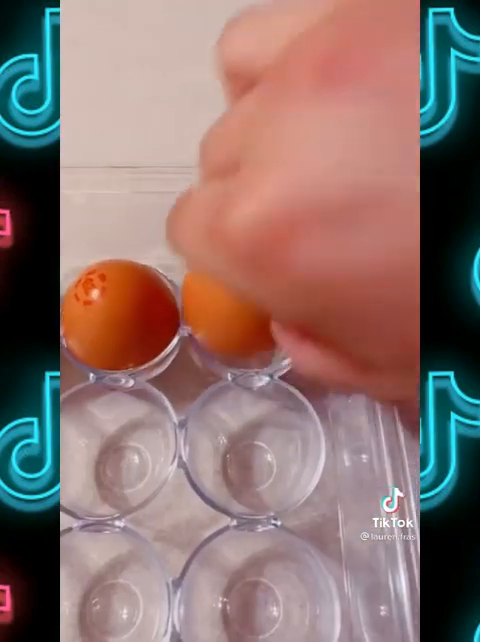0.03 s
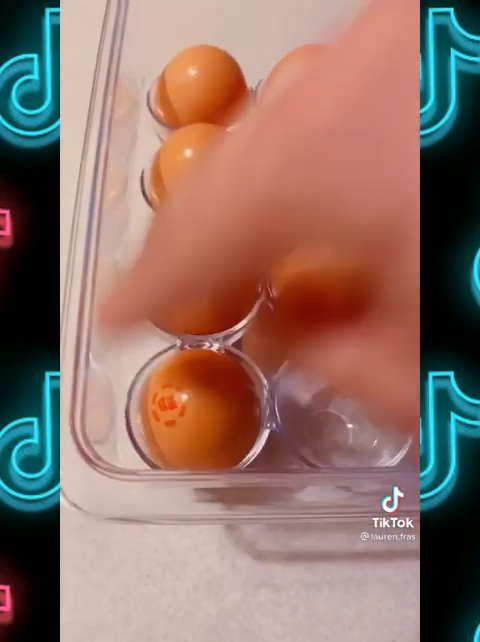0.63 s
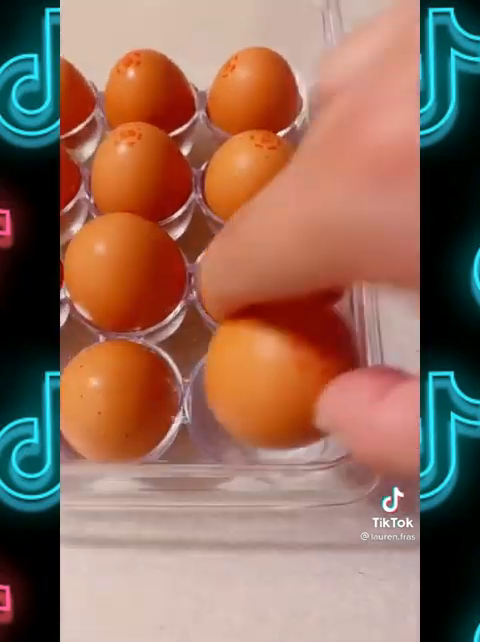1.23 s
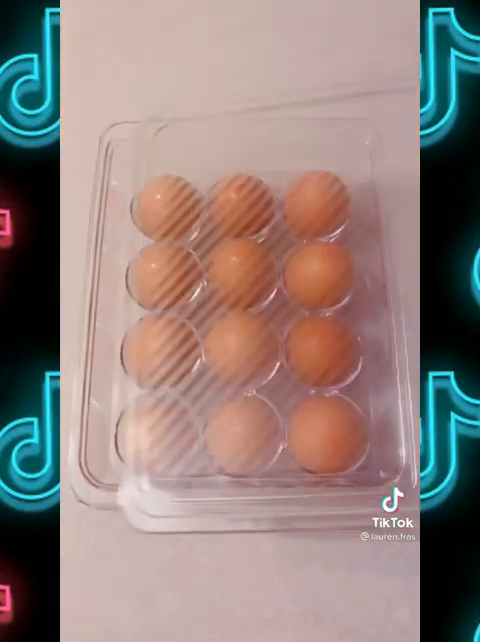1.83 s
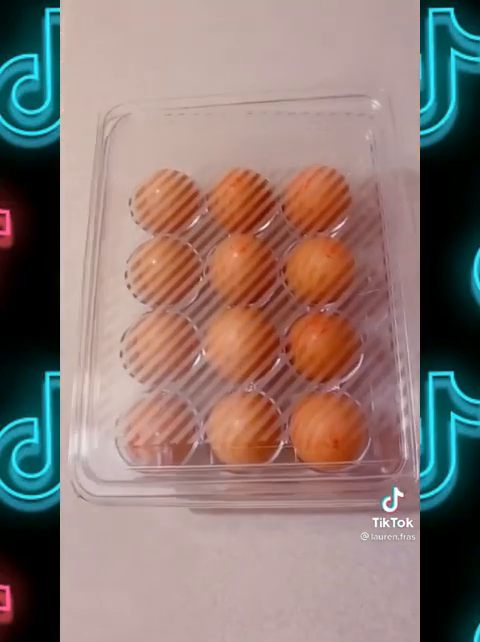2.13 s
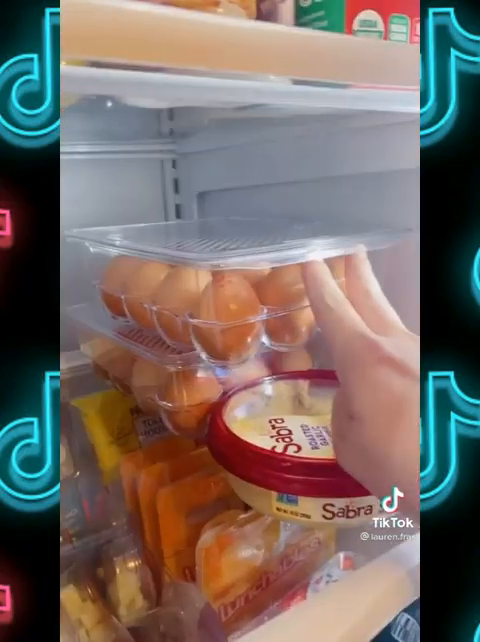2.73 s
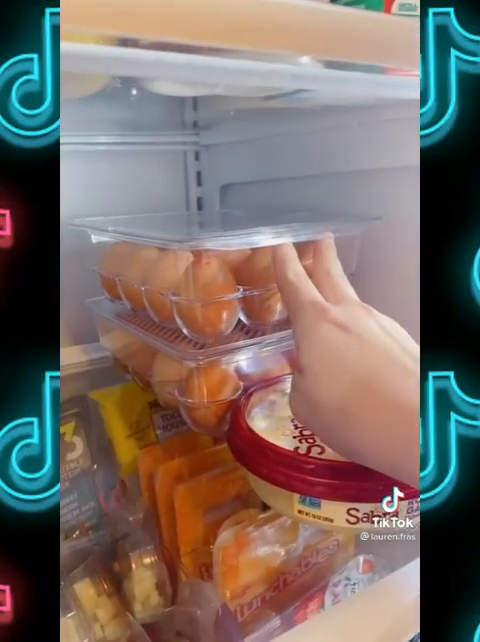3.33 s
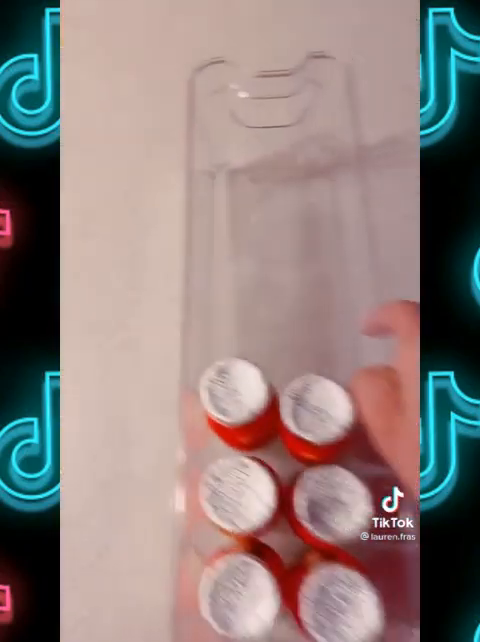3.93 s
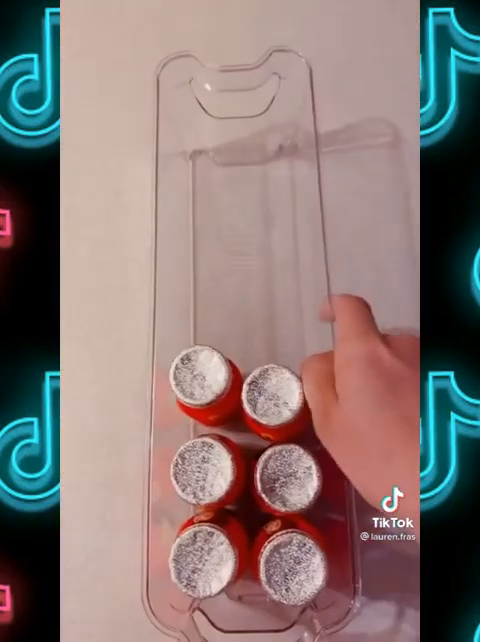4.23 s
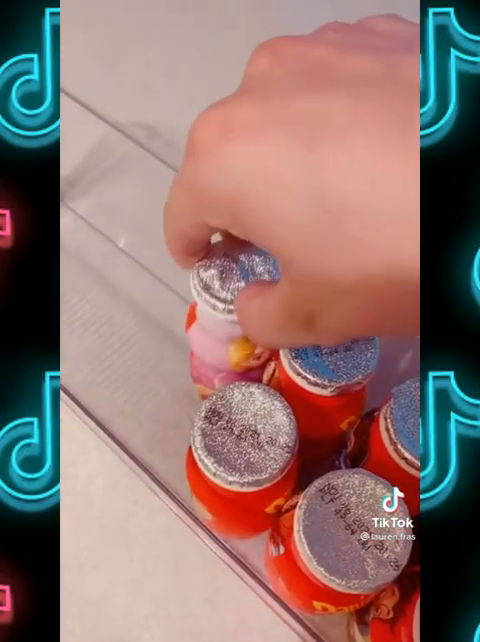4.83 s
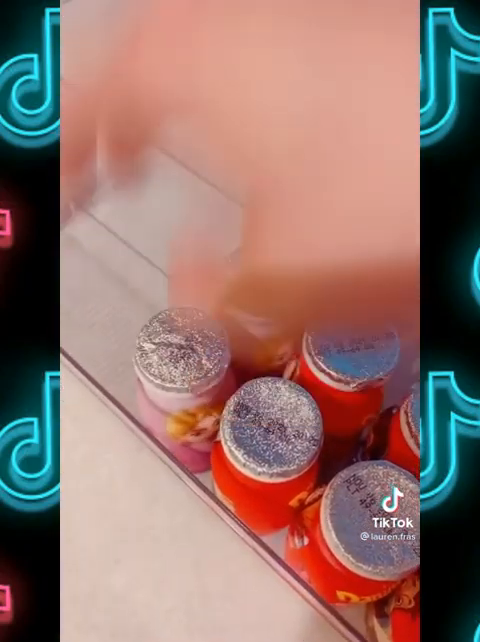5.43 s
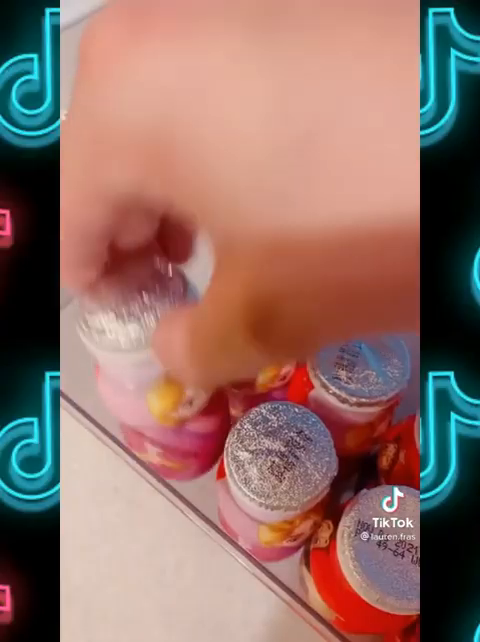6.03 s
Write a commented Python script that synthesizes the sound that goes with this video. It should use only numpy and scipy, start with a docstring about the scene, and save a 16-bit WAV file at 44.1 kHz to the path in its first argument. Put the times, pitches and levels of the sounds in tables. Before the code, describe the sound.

Close up in a kitchen, eggs are set into a plastic tray with quick, uneven taps and little rubs. The lid clacks on with a hollow boom, and the tray bumps and scrapes into a faintly humming fridge. A long plastic bin then drops onto the counter, bounces and settles, and small bottles are stood in it with light knocks. The action comes in short bursts with a slight room echo, cut apart by dead silence.

```python
"""A kitchen, heard close up. Eggs are set into a plastic tray, its lid is clapped on and the tray slides
into a humming fridge. Then a long plastic bin drops onto the counter and small bottles are stood in it.
Each impact excites the damped modes of the bodies that meet, and the air under the lid booms as a cavity.
Stick-slip friction makes the rubs and scrapes; brief swishes swell into the taps. The room adds echoes,
low noise and a thin whine; the action comes in short stretches with dead silence between them."""
import sys
import numpy as np
from scipy import signal
from scipy.fft import rfft, irfft
from scipy.io import wavfile
from scipy.ndimage import uniform_filter1d

SR = 44100
rng = np.random.default_rng(int(sys.argv[2]) if len(sys.argv) > 2 else 0)


def dump(signal):
    """Clip the signal to [-1, 1] and save it as 16-bit WAV at the path in sys.argv[1]."""
    limited = np.clip(np.atleast_2d(signal).T, -1, 1)
    pcm = np.round(limited * 32767).astype(np.int16)
    wavfile.write(sys.argv[1], SR, pcm)


N = 271920
TIME = np.arange(N) / SR
RING_TIME = TIME[:SR // 3]
RING_BINS_HZ = np.fft.rfftfreq(len(RING_TIME), 1 / SR)
PUSH_START_S, PUSH_SLOWS_S, PUSH_END_S = 2.69, 3.11, 3.67  # the tray goes into the fridge

# spectrum of friction on plastic (frequency [Hz], level [dB])
RUB_COLOUR = [(80, -3), (300, -28.5), (900, 9), (1600, 2), (2400, 2.5), (3300, -7), (6000, -16),
              (15000, -41)]


def amp(db):
    """Decibels to amplitude ratio."""
    return 10 ** (np.asarray(db) / 20)


def unit(x):
    """Normalisation to rms 1."""
    return x / np.sqrt(np.mean(x ** 2) + 1e-20)


def read(table, hz):
    """Interpolation of a table's columns on a log-frequency axis."""
    f, *columns = np.transpose(table)
    return [np.interp(np.log(hz + 1), np.log(f), c) for c in columns]


def held(table, s):
    """A step function of time: each row holds until the next."""
    start, value = np.transpose(table)
    return value[np.searchsorted(start[1:], s)]


def add(mix, s, sound):
    """Superposition: a sound joins the mix at time s."""
    start = round(s * SR)
    sound = sound[max(-start, 0):]
    part = mix[max(start, 0):][:len(sound)]
    part += sound[:len(part)]


def coloured(x, colour):
    """Spectral shaping of x, at rms 1."""
    gain = amp(read(colour, np.fft.rfftfreq(len(x), 1 / SR))[0])
    return unit(irfft(rfft(x) * gain, len(x)))


def noise_from(spectrum):
    """Random phases turn a spectrum into steady noise."""
    return irfft(spectrum * np.exp(2j * np.pi * rng.random(len(RING_BINS_HZ))))


def damped(carriers, hz, t60, rise_cycles=1.6):
    """Each row builds up over its first cycles, so bass comes late, and decays exponentially."""
    swell = 1 - np.exp(-RING_TIME * hz[:, None] / rise_cycles)
    rings = carriers * swell * amp(-60 * RING_TIME / t60[:, None])
    return rings / np.linalg.norm(rings, axis=1, keepdims=True) * np.sqrt(SR / 100)  # 10 ms at rms 1


def contact(hz, bass_db, treble_db):
    """Excitation spectrum: a heavy blow adds bass, a hard and short one adds treble."""
    return amp(read([(250, bass_db), (900, 0.002), (1600, 0.0095), (6000, treble_db)], hz)[0])


def ring(modes, bass_db=0, treble_db=0, detune=0.0067):
    """Normal modes, shifted slightly by where the blow lands; neighbours swing in antiphase."""
    hz, db, t60 = np.transpose(modes)
    hz = hz * (1 + detune * rng.standard_normal(len(hz)))
    waves = np.sin(2 * np.pi * hz[:, None] * RING_TIME) * (-1) ** np.arange(len(hz))[:, None]
    return amp(db) * contact(hz, bass_db, treble_db) @ damped(waves, hz, t60)


def clatter(wall, bass_db, treble_db, count=27):
    """Modal overlap: crowded modes merge into noise bands, each decaying at its own rate."""
    edges = np.geomspace(48, 16500, count + 1)
    hz = np.sqrt(edges[1:] * edges[:-1])
    bands = noise_from((RING_BINS_HZ >= edges[:-1, None]) & (RING_BINS_HZ < edges[1:, None]))
    db, t60 = read(wall, hz)
    return amp(db) * contact(hz, bass_db, treble_db) @ damped(bands, hz, t60)


def knock(modes, wall, bass_db, treble_db, click_db=-6, click_s=0.00012):
    """Impact on a plastic body: a contact click, then free vibration of the walls."""
    u = RING_TIME / click_s
    click = amp(click_db + treble_db) * 2 * u * (2 - u) * np.exp(-u)
    return click + amp(-7) * (ring(modes, bass_db, treble_db) + clatter(wall, bass_db, treble_db))


def knocked(blows, modes, wall):
    """The responses of one body to successive blows add linearly."""
    out = np.zeros(N)
    for s, db, bass_db, treble_db in blows:
        add(out, s, amp(db) * knock(modes, wall, bass_db, treble_db))
    return out


def placed(taps, modes, wall, pitches, firm_bass_db, ring_db, ring_t60, swish_db, swish_s):
    """An impact excites both object and plastic; a brief, duller swish swells into each tap."""
    firm_db, thud_db_per_db = -19.5, 0.29  # the gentler a tap, the more of it is thud
    out, swell = np.zeros(N), np.linspace(0, 1, round(swish_s * SR))
    dull = contact(RING_BINS_HZ, bass_db=-2, treble_db=-4)
    for s, db, treble_db in taps:
        hz = held(pitches, s)
        bass_db = firm_bass_db + thud_db_per_db * (firm_db - db)
        # a nearly round shell rings in a close pair of modes
        shell = ring([(hz, ring_db, ring_t60), (hz * 1.09, ring_db - 6, ring_t60)])
        tap = knock(modes, wall, bass_db, treble_db) + shell
        swish = noise_from(rfft(tap) * dull)[:len(swell)]
        add(out, s, amp(db) * tap)
        add(out, s - swish_s, amp(db + swish_db) * swell * unit(swish))
    return out


def slips(colour, per_s, spread_db):
    """Stick-slip friction: a random stream of tiny impulses of uneven strength."""
    strength = amp(spread_db * np.minimum(rng.exponential(1, N), 4))
    impulses = rng.standard_normal(N) * strength * (rng.random(N) < per_s / SR)
    return coloured(impulses, colour)


def pressure(strokes):
    """Friction's envelope: contact pressure rises and falls with each stroke."""
    out = np.zeros(N)
    for s, length, db in strokes:
        add(out, s, amp(db) * signal.windows.tukey(round(length * SR), .5))
    return out


def slide(start_s, slows_s, end_s, colour, rumble_db, scrape_db, rumble_db_per_s, scrape_db_per_s):
    """Sliding friction: the body rumbles and the plastic scrapes; on slowing, the scrape dies first."""
    slowing_s = np.maximum(TIME - slows_s, 0)
    rumble = amp(rumble_db + rumble_db_per_s * slowing_s) * coloured(rng.standard_normal(N), colour)
    scrape = amp(scrape_db + scrape_db_per_s * slowing_s) * slips(RUB_COLOUR, per_s=13000, spread_db=2.5)
    return (rumble + scrape) * (TIME > start_s) * (TIME < end_s)


def egg_taps():
    """Each egg excites the modes of its cup and the natural frequency of its own shell."""
    # an egg meets its cup (time [s], level [dB], treble [dB])
    taps = [(.016, -38, 1.5), (.0797, -18.5, 1), (.166, -31, -2), (.1795, -22, 0.5), (.4692, -20, 9),
            (.5478, -25.5, -3), (.633, -21.5, 1.5), (.651, -17.5, -4.5), (.663, -22, -8.5),
            (.919, -20.5, 1), (1.0145, -11, -1), (1.085, -32, -7), (1.150, -33, -1.5), (1.284, -39.5, 5),
            (1.3995, -25.5, 4), (1.4643, -11.5, -4.5), (1.559, -33.5, -3.5)]
    # the cup's distinct modes (frequency [Hz], level [dB], t60 [s])
    modes = [(243, -14.5, 0.023), (410, -11.5, 0.013), (988.5, -2, 0.035), (1290, -8.5, 0.048),
             (1810, -13.5, 0.066), (2263, -7.5, 0.064), (2590, -12, 0.031), (3342, -23, 0.062),
             (3913, -15, 0.032), (4534, -22.5, 0.025)]
    # its crowded wall modes (frequency [Hz], band level [dB], t60 [s])
    wall = [(45, -47, 0.063), (147, -15.5, 0.077), (384, -9.5, 0.026), (583, -12.5, .035),
            (830, -4.5, 0.012), (1530, -8.5, 0.11), (2250, -7, 0.022), (3000, -7.5, 0.05),
            (4500, -18, 0.07), (6050, -21.5, 0.033), (9910, -33, 0.027), (14900, -45, .02)]
    # each egg's shell note (start time [s], frequency [Hz])
    pitches = [(0, 1710), (.35, 2273), (.78, 1316), (1.22, 2382)]
    return placed(taps, modes, wall, pitches, firm_bass_db=0,
                  ring_db=-8, ring_t60=0.017, swish_db=-10, swish_s=0.02)


def closing_lid(bass_db=-1.5, boom_hz=442, boom_sag=0.36, boom_t60=0.11):
    """Cavity resonance: the lid clacks and the air under it booms, lower as the gap closes."""
    # the lid strikes the rim (time [s], level [dB], treble [dB], boom [dB])
    blows = [(1.9152, -25.5, 10.5, -11.5), (1.938, -30.5, -7, -20), (1.9787, -21.5, 9, -11),
             (2.016, -17.5, 2, -15), (2.038, -15, -3.5, -14.5), (2.05, -28, 4, -7.5), (2.253, -15.5, -1, 0),
             (2.289, -22, -7, 1.5), (2.302, -17.5, 0.5, -13), (2.323, -19.5, -4.5, -10),
             (2.345, -21.5, -22, -3.5)]
    # the lid's distinct modes (frequency [Hz], level [dB], t60 [s])
    modes = [(235.7, -12.5, 0.085), (653, -16, 1), (990, -13, 0.055), (1520, -15.5, 0.065),
             (1833, -7.5, 0.088), (2332, -3, 0.056), (2601, -4, 0.079), (2650, -1.5, 0.05),
             (4160, -14.5, 0.056), (5770, -17.5, 0.092)]
    # its crowded wall modes (frequency [Hz], band level [dB], t60 [s])
    wall = [(50, -22.5, 0.25), (160, -18.5, 0.19), (400, -13.5, 0.36), (790, -2, 0.067), (1300, -7, 0.29),
            (2500, -2, 0.1), (3650, -5.5, 0.082), (6000, -17.5, 0.1), (10550, -19, 0.042),
            (15000, -21.5, 0.034)]
    seats_s, closing_s = 2.25, 0.095  # it meets the whole rim, then is pressed home
    out = knocked([(s, db, bass_db, treble_db) for s, db, treble_db, _ in blows], modes, wall)
    for s, db, _, boom_db in blows:
        closed = np.clip((s - seats_s) / closing_s, 0, 1)
        hz = boom_hz * (1 - boom_sag * closed ** 2)
        add(out, s, amp(db) * ring([(hz, boom_db, boom_t60)]))
    return out


def bumping_tray(stack_lag_s=0.02034):
    """Each bump excites the tray's modes; the stack under it gives way a moment later and thuds."""
    # the tray bumps along the stack in the fridge (time [s], level [dB], bass [dB], treble [dB])
    bumps = [(2.719, -15.5, -3.5, -1), (2.843, -19, 1.5, -1), (2.8934, -17.5, 5, -12.5),
             (2.9314, -19, -2, -15.5), (3.0623, -17.5, 3.5, -1.5), (3.19, -41, 12.5, -3),
             (3.552, -39.5, -6.5, 4.5)]
    # the full tray's distinct modes (frequency [Hz], level [dB], t60 [s])
    modes = [(68.7, -17, 0.1), (116.5, -7, 0.48), (189, -2.5, 0.22), (286.3, -2, 0.36), (1206, -8, 0.13),
             (1389, -7, 0.056), (2182, -2, 0.013)]
    # its crowded wall modes (frequency [Hz], band level [dB], t60 [s])
    wall = [(60.3, -23, 0.19), (161, -9.5, 0.047), (356, -7, 0.024), (875, -6, 0.14), (2280, -8, 0.086),
            (4000, -7.5, 0.067), (5600, -10, 0.063), (10340, -21.5, 0.043), (15100, -30, 0.091)]
    # the loaded stack's modes (frequency [Hz], level [dB], t60 [s])
    stack_modes = [(68.4, -7.5, 0.17), (102.2, -5.5, .13), (218, -9, 0.2), (298.8, -9.5, 0.13)]
    out = knocked(bumps, modes, wall)
    for s, db, _, _ in bumps:
        add(out, s + stack_lag_s, amp(db) * ring(stack_modes, detune=0.055))
    return out


def dropped_bin(rock_start_s=4.342, rock_period_s=0.033, tick_db=-36, step_db=-2):
    """Impact and rebound of the bin; a bottle in it rocks to rest with even, fading ticks."""
    # one end lands, then the other, and it bounces (time [s], level [dB], bass [dB], treble [dB])
    blows = [(4.017, -10, -2.5, -0.5), (4.038, -30.5, 9, -8.5), (4.1075, -11.5, 6, 8.5),
             (4.1175, -7, -0.5, -23.5), (4.131, -19, -12.5, -13), (4.147, -13.5, -15, -16.5),
             (4.283, -33.5, -9, 8)]
    # the bin's distinct modes (frequency [Hz], level [dB], t60 [s])
    modes = [(112, -7, 0.18), (321.5, -11.5, 0.049), (465.7, -12, 0.04), (740, -6.5, 0.035),
             (790, -9, 0.029), (1074, -7.5, 0.021), (1948, -8.5, 0.079), (2291, -4.5, 0.025),
             (2720, -36.5, .03), (3250, -26.5, 0.074)]
    # its crowded wall modes (frequency [Hz], band level [dB], t60 [s])
    wall = [(45, -31.5, 0.18), (124, -8, 0.11), (237, -11, 0.08), (555, -13, 0.34), (830, -2.5, 0.15),
            (1360, -7.5, 0.02), (2200, -1, 0.036), (3320, -13.5, .03), (6060, -34, 0.037),
            (10000, -38.5, 0.025), (15000, -41, .028)]
    ticks = [(rock_start_s + k * rock_period_s, tick_db + k * step_db, -7, -3) for k in range(4)]
    return knocked(blows + ticks, modes, wall)


def bottle_taps(chink_hz=3600):
    """Bottles strike the bin and chink, all at the same natural frequency."""
    # a bottle is stood in the bin or knocks against it (time [s], level [dB], treble [dB])
    taps = [(4.848, -17, -9), (4.8575, -14.5, -11.5), (5.195, -36.5, -4), (5.3332, -16, -5.5),
            (5.755, -35.5, -9), (5.8195, -17, -1.5), (5.834, -27.5, -6), (5.898, -40.5, 8.5),
            (6.107, -44, -0.5), (6.157, -30.5, 1.5)]
    # distinct modes of bottle on bin (frequency [Hz], level [dB], t60 [s])
    modes = [(136, -14, 0.1), (229, -31, 0.067), (797, -4, 0.021), (885, -7.5, 0.017), (1174, -24, 0.017),
             (2010, -6.5, 0.025), (2220, -12, 0.013), (3540, -30, 0.0058)]
    # crowded wall modes (frequency [Hz], band level [dB], t60 [s])
    wall = [(45, -42, 0.1), (105, -11, 0.047), (218, -12.5, 0.086), (420, -14, 0.052), (810, -10, 0.032),
            (1370, -14.5, 0.021), (2200, -13, 0.014), (3640, -15, 0.034), (5960, -21.5, 0.015),
            (9600, -30.5, .018), (15000, -34, 0.017)]
    return placed(taps, modes, wall, [(0, chink_hz)], firm_bass_db=-2.5,
                  ring_db=-23, ring_t60=0.0083, swish_db=-13.5, swish_s=0.019)


def sliding_tray():
    """Friction makes the tray judder as it is pushed into the fridge."""
    # spectrum of the tray's rumble (frequency [Hz], level [dB])
    colour = [(18, -44), (30, -28), (63, 0), (108, 8.5), (124, -35), (146, 0), (276, -4), (314, -0.5),
              (394, -5), (417, -11), (649, -18.5), (759, -16), (900, -48.5), (1170, -50), (1980, -120)]
    return slide(PUSH_START_S, PUSH_SLOWS_S, PUSH_END_S, colour,
                 rumble_db=-34.5, scrape_db=-37.5, rumble_db_per_s=-18, scrape_db_per_s=-65)


def settling_bin():
    """Friction brings the wobbling bin to rest on the counter."""
    # spectrum of the bin's rumble (frequency [Hz], level [dB])
    colour = [(35, -22.5), (60, 3), (105, 2), (160, 1), (300, -19), (600, -28.5), (1500, -68.5)]
    return slide(start_s=4.115, slows_s=4.32, end_s=4.6, colour=colour,
                 rumble_db=-41, scrape_db=-47, rumble_db_per_s=-23, scrape_db_per_s=-42)


def rubs():
    """Friction noise of shells, lid, bin and bottles on the plastic."""
    # rubbing strokes (time [s], duration [s], level [dB])
    strokes = [(0.156, 0.026, -29), (0.598, 0.099, -40), (2.027, 0.19, -41.5), (2.212, 0.041, -39),
               (2.257, 0.12, -29.5), (4.125, 0.046, -29.5), (4.828, 0.061, -33)]
    return pressure(strokes) * slips(RUB_COLOUR, per_s=4000, spread_db=1.5)


def pitched_swishes(relative_bandwidth=0.12):
    """Narrow-band noise is heard as pitched: short swishes that swell, mostly into a tap."""
    # pitched swishes (time [s], duration [s], level [dB], frequency [Hz])
    swishes = [(0.157, 0.036, -30, 2300), (0.615, 0.028, -33, 2340), (1.372, .024, -39, 2440),
               (1.451, 0.011, -28, 2210), (4.688, 0.014, -69, 6900), (4.837, .022, -38, 3450),
               (5.412, 0.024, -60.5, 8350), (5.797, 0.024, -38, 3320), (6.147, 0.021, -42, 3410),
               (6.153, 0.015, -36.5, 1860)]
    out = np.zeros(N)
    for s, length, db, hz in swishes:
        size = round(length * SR)
        band = 1 / (1 + (2 * (RING_BINS_HZ / hz - 1) / relative_bandwidth) ** 2)
        swell = signal.windows.tukey(size, .5) * np.linspace(0, 1, size)
        add(out, s, amp(db) * unit(swell * noise_from(band)[:size]))
    return out


def nudges():
    """A soft contact excites only low modes: a thump without a click."""
    # the hand nudges the bin (time [s], level [dB])
    touches = [(4.773, -41.5), (5.196, -37), (5.249, -40), (5.779, -36.5), (6.109, -41)]
    # modes of the bin's floor (frequency [Hz], level [dB], t60 [s])
    modes = [(90, -10.5, 0.13), (140, -4, 0.093), (232, -3, 0.068)]
    out = np.zeros(N)
    for s, db in touches:
        add(out, s, amp(db) * ring(modes, detune=0.057))
    return out


def rustles():
    """Friction noise of fingers on the bin and the foil caps."""
    # finger strokes (time [s], duration [s], level [dB])
    strokes = [(4.45, 0.15, -52.5), (4.76, 0.05, -55.5), (4.925, 0.027, -50.5), (5.183, 0.063, -45),
               (5.408, 0.033, -48.5), (5.752, 0.023, -49), (5.865, 0.037, -59), (6.006, 0.027, -58),
               (6.06, 0.032, -58)]
    # spectrum of the rustle (frequency [Hz], level [dB])
    colour = [(100, 6), (800, 5), (2200, 0), (4000, -5), (6500, -13), (9000, -12), (15000, -31)]
    return pressure(strokes) * slips(colour, per_s=9000, spread_db=0.5)


def kitchen(x, first_echo_s=0.0085):
    """Reverberation: diffuse reflections from walls and cupboards; the top treble dies first."""
    # the room's response (frequency [Hz], level [dB], t60 [s])
    response = [(80, -7.5, 0.17), (252, 7, 0.41), (760, 3.5, 0.41), (2200, 0.5, 0.41), (4455, -1.5, 0.42),
                (8950, 3, .38), (14800, 4.5, 0.043)]
    echoes = rng.standard_normal(SR) * np.clip(TIME[:SR] / first_echo_s - 1, 0, 1)
    hz, t, spectra = signal.stft(echoes, SR, nperseg=256)
    db, t60 = read(response, hz)
    decay = amp(db[:, None] - 60 * t / t60[:, None])
    tail = signal.istft(spectra * decay, SR, nperseg=256)[1]
    return signal.fftconvolve(x, tail / np.linalg.norm(tail))[:N]


def tone(hz, db, waver_hz=5):
    """A machine tone with slight random frequency modulation."""
    drift = waver_hz * unit(uniform_filter1d(rng.standard_normal(N), size=1500))
    return amp(db) * np.sqrt(2) * np.sin(2 * np.pi * np.cumsum(hz + drift) / SR)


def fridge():
    """The open fridge hums with a line spectrum while the tray goes in."""
    # partials of the hum (frequency [Hz], level [dB])
    partials = [(307, -57.5), (1276, -62.5), (3682, -74), (4565, -90), (4764, -74.5), (5399, -76)]
    return sum(tone(hz, db) for hz, db in partials) * (TIME > PUSH_START_S) * (TIME < PUSH_END_S)


def room_tone():
    """Ambient noise: low kitchen air and a thin appliance whine that is fainter later on."""
    # steps in the air's loudness (start time [s], level [dB])
    levels = [(0, -53.5), (.35, -55.5), (1.75, -52), (2.63, -54), (3.72, -51), (4.64, -52)]
    # spectrum of the air (frequency [Hz], level [dB])
    colour = [(30, -6.5), (70, -6.5), (160, -2), (355, -0.5), (470, -9.5), (760, -12), (1500, -20),
              (2300, -19), (3200, -24), (4900, -26), (7300, -35), (11000, -40.5), (15500, -34.5)]
    air = amp(held(levels, TIME)) * coloured(rng.standard_normal(N), colour)
    whine = tone(hz=3760, db=np.interp(TIME, [3.6, 3.8], [-73.5, -78.5]))
    return air + whine


def scene():
    """Superposition of direct sound, reverberation and background."""
    eggs = egg_taps()
    bottles = bottle_taps() + nudges()
    tray, long_bin, lid = bumping_tray(), dropped_bin(), closing_lid()
    rubbing, swishes = rubs(), pitched_swishes()
    direct = eggs + bottles + tray + long_bin + lid + rubbing + swishes
    direct += rustles() + sliding_tray() + settling_bin()
    # two groups of sources, each with its own pattern of echoes
    room = kitchen(amp(-18.5) * (eggs + rubbing + swishes) + amp(-9) * long_bin)
    room += kitchen(amp(-19) * bottles + amp(-12) * (tray + lid))
    return (direct + room + fridge() + room_tone())[None]


def record(dry, low_cut_hz=36, high_cut_hz=15700, ceiling=1.2):
    """Band limiting and soft saturation, with a gate that leaves silence between the stretches."""
    # stretches with sound (start time [s], end time [s])
    stretches = [(0, .307), (.408, .727), (.839, 1.166), (1.268, 1.662), (1.851, 2.562), (2.694, 3.662),
                 (3.789, 4.595), (4.682, 5.03), (5.136, 5.494), (5.616, 5.908), (6.002, 6.166)]
    gate = sum((TIME >= start) & (TIME < end) for start, end in stretches).astype(float)
    thinned = signal.sosfilt(signal.butter(4, low_cut_hz, "high", fs=SR, output="sos"), dry)
    rounded = ceiling * np.tanh(thinned / ceiling)
    gated = rounded * uniform_filter1d(gate, size=90)
    low_pass = signal.firwin(511, high_cut_hz, window=("kaiser", 9), fs=SR)
    return signal.oaconvolve(gated, low_pass[None], "same")


dry = scene()
out = record(dry)
dump(out)
```